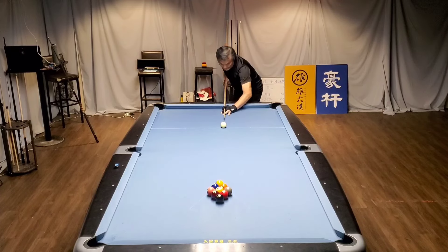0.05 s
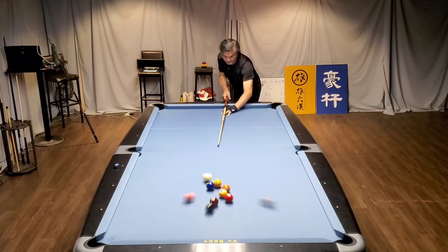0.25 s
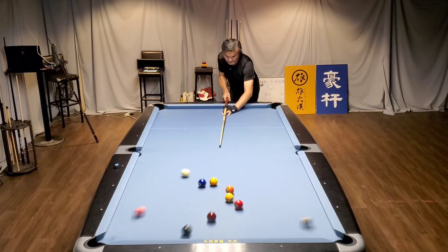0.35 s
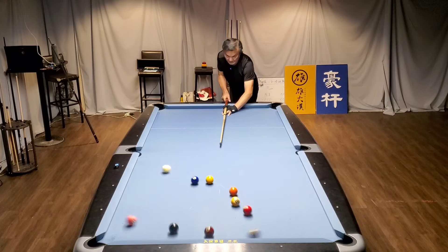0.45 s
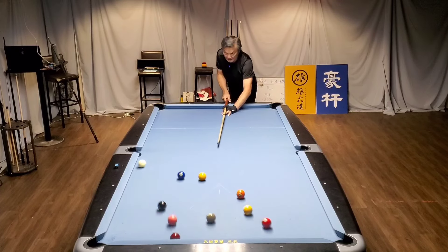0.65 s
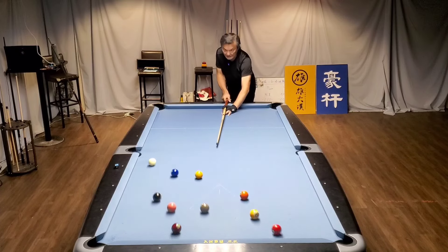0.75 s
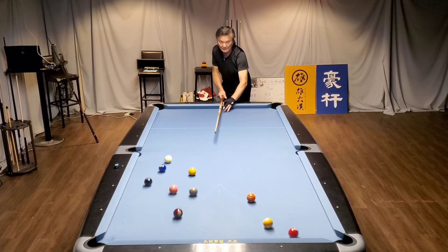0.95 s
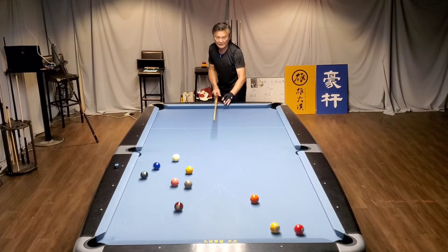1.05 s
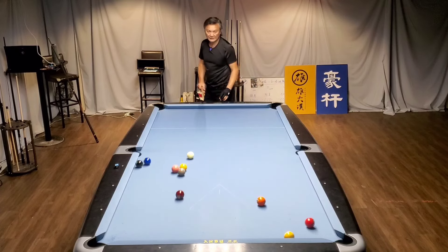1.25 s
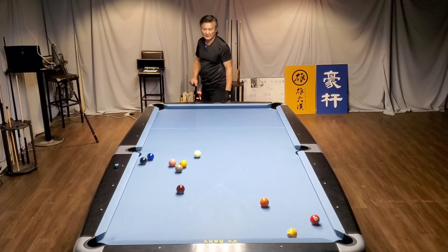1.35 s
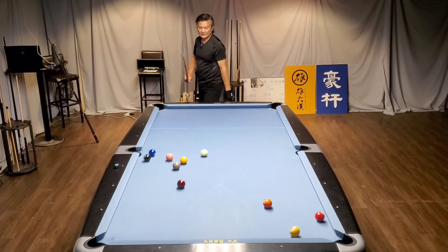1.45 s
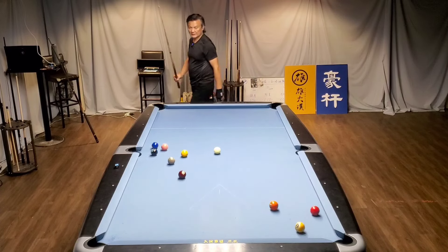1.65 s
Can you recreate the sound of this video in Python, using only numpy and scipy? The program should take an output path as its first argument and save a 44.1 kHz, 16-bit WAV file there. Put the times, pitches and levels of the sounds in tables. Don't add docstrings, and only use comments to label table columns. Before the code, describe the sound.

A pool break shot in a quiet, lively room. After faint room tone, a hard woody cue snap at 0.21 s, then at 0.34 s a piercing, clipped crack as balls burst apart, with low table boom and short reverberation. Cushion thuds tumble from 0.38 to 0.6 s. Crisp ball clicks at 0.67 and 0.74 s, a soft rail knock at 0.78, then softer clicks at 1.31, 1.37 and 1.42 s.

```python
import sys
import numpy as np
from scipy import signal
from scipy.fft import rfft, irfft, next_fast_len
from scipy.io import wavfile

SR = 44100
rng = np.random.default_rng(int(sys.argv[2]) if len(sys.argv) > 2 else 0)


def unload_audio(sound):
    columns = np.transpose(np.atleast_2d(sound))
    steps = np.round(np.clip(columns, -1, 1) * 32767)
    wavfile.write(sys.argv[1], SR, steps.astype(np.int16))


def natural_amplitude(level_db):
    exponent = np.asarray(level_db, float) / 20
    return 10 ** exponent


N = 74970
T = np.arange(N) / SR
SIZE = next_fast_len(2 * N)
HZ = np.arange(SIZE // 2 + 1) * SR / SIZE


def shape(x, response):
    return irfft(rfft(x, SIZE) * response, SIZE)[..., :N]


def band(hz, width_hz):
    return 1j * HZ * width_hz / (hz ** 2 - HZ ** 2 + 1j * HZ * width_hz)


def soft(hz):
    return 1 / (1 + 1j * HZ / hz)


def thin(hz):
    return 1j * HZ / (hz + 1j * HZ)


def peak(x, db):
    return x * natural_amplitude(db) / np.abs(x).max()


def fade(start, t60, rise):
    t = np.maximum(T - start, 0)
    return (1 - np.exp(-t / max(rise, 1e-4))) * natural_amplitude(-60 * t / t60)


def pan(db):
    return natural_amplitude(np.array([[db], [-db]]) / 2)


def widen(mid, side):
    bass_wide_db = -17
    return mid + natural_amplitude(bass_wide_db) * side * np.array([[1], [-1]])


def air():
    # f/Hz, density/dB
    air_spectrum = np.array([(18, -74), (30, -52), (79, -12), (210, -7), (295, -8.5), (449, -15.5),
                             (600, -14), (1860, -31.5), (16000, -37)])
    level_db, side_db, left_db = -68.5, -4.5, 6
    density_db = np.interp(np.log(HZ + 1), np.log(air_spectrum[:, 0]), air_spectrum[:, 1])
    noise = shape(rng.standard_normal((3, N)), natural_amplitude(density_db))
    noise = noise / noise.std() * natural_amplitude(level_db)
    tone = pan(left_db) * (noise[0] + natural_amplitude(side_db) * noise[1:])

    earlier_db, earlier_t60_s, earlier_pan_db = -69.5, 0.39, -9
    earlier = shape(rng.standard_normal(N), band(400, 1500) ** 2)
    earlier = earlier / earlier.std() * natural_amplitude(earlier_db - 60 * T / earlier_t60_s)
    return tone + pan(earlier_pan_db) * earlier


def booms():
    # t/s, level/dB, t60/s
    frame_swells = [
        (.001, -68, .4),
        (.215, -49, 0.86),
        (.34, -23, 0.11),
        (0.438, -38.5, 0.58),
        (.68, -51, 0.67),
        (.79, -61.5, 0.24),
        (.92, -59, 0.48),
        (1.266, -42.5, 0.11),
        (1.44, -65, .3),
    ]
    frame_hz, width_hz, rise_s = 82, 40, .015
    mid, side = shape(rng.standard_normal((2, N)), band(frame_hz, width_hz) ** 2)
    noise = widen(mid, side) / mid.std()
    return noise * sum(natural_amplitude(db) * fade(s, t60, rise_s) for s, db, t60 in frame_swells)


def thuds():
    # t/s, level/dB, f/Hz, t60/s
    cushion_hits = [(.017, -49, 700, .03), (0.3384, -24, 900, 0.0067), (.343, -13, 560, 0.022),
                    (0.383, -24, 420, .05), (.432, -12, 587, 0.018), (0.451, -21.5, 541, 0.086),
                    (0.502, -24, 370, .06), (.545, -27, 321, 0.02), (.59, -44.5, 425, 0.092),
                    (0.624, -35, 407, 0.025), (.68, -41.5, 373, 0.017), (0.779, -34.5, 445, 0.0497),
                    (0.817, -49.5, 330, .06), (1.262, -54, 214, 0.075), (.24, -34, 520, 0.28),
                    (0.288, -32, 480, 0.13)]
    push_rise_s, knock_db = .016 / 4, -11
    out = np.zeros((2, N))
    for s, db, hz, t60 in cushion_hits:
        push = rng.standard_normal((2, N)) * fade(s, t60, push_rise_s)
        rail = band(hz, hz * .6) ** 2
        knock = band(hz * .4, hz * .45) ** 2
        mid, side = peak(shape(push, rail + natural_amplitude(knock_db) * knock), db)
        out += widen(mid, side)
    return out


def clicks():
    meetings = [(.3408, 2), (.3415, 3), (.3449, 2), (.3465, 5), (.3655, 4), (.6650, 2), (.6654, 3),
                (.74172, 2), (.74203, 3), (1.3118, 2), (1.36545, 2), (1.42105, 2), (.0203, 2)]
    # contact time/ms, time between pulses/ms, level change per pulse/dB
    contacts = [(.3, .3, -.5), (.3, .31, .1), (.55, .5, -8), (.24, .225, -.5), (.34, .37, -.5), (.4, 1, 0),
                (.4, .7, -1), (.39, .73, -1), (.39, .72, -1.5), (.52, .9, -6), (.46, 1.17, -13),
                (.47, .9, -14), (.7, 1.3, -3)]
    # direct level/dB, level into the room/dB
    meeting_levels = [(4, 2.5), (0.5, -3), (1, -7), (-1, -1.5), (-11.5, -4), (-24.5, -19.5), (-66, -78),
                      (-10, -17.5), (-31, -46), (-67, -44), (-16.5, -28.5), (-17.5, -30.5), (-51.5, -62)]
    # f/Hz, width/Hz, level/dB
    resin_modes = [(6200, 680, -14), (9300, 1300, 1.5), (13000, 4000, 4.5)]
    resin_direct_db = -8.5
    ball = band(2450, 2000) * thin(800) ** 3
    resin = sum(natural_amplitude(db) * band(hz, width_hz) ** 2 for hz, width_hz, db in resin_modes)
    toward_us = ball * soft(4000) + natural_amplitude(resin_direct_db) * resin

    direct, wet = np.zeros(N), np.zeros(N)
    for (s, count), (contact_ms, step_ms, change_db), (db, room_db) in zip(meetings, contacts, meeting_levels):
        order = np.arange(count)
        late_ms = (T - s) * 1000 - step_ms * order[:, None]
        push = np.sin(np.pi * np.clip(late_ms / contact_ms + 1, 0, 1)) ** 2
        chain = -natural_amplitude(change_db * order) @ push
        direct += peak(shape(chain, toward_us), db)
        wet += peak(shape(push[0], ball + resin), room_db)

    rattle = rng.standard_normal(N) * fade(.341, t60=.02, rise=0)
    return direct, wet + peak(shape(rattle, band(6500, 9000)), -27)


def cue():
    # t/s, level/dB, length/s
    tip_blows = [
        (.2116, -22, .0015),
        (.2134, 0, .0008),
        (.2150, -3, .0012),
        (.2186, -11, .0015),
    ]
    # f/Hz, level/dB, t60/s
    shaft_modes = [(150, -19.5, .04), (420, -16.5, 0.014), (620, -8, 0.013), (1166.4, -10.5, 0.019),
                   (1717, -12.5, .04), (2173, -16, 0.013), (2222, -14, .03), (2724, -14, .03),
                   (3500, -10.5, 0.019), (4165, -2, 0.013), (4800, 6, 0.0078), (7900, -5, 0.0066),
                   (10000, -9, 0.0029), (12800, -16.5, .01)]
    snap_db, snap_t60_s = 8.5, 0.00029
    level_db, crack_db, room_crack_db = -4, -22.5, -14.5
    envelope = sum(natural_amplitude(db) * fade(s, 4 * length, length / 4) for s, db, length in tip_blows)
    rough = rng.standard_normal(N) * envelope
    snap = sum(natural_amplitude(db + snap_db) * fade(s, snap_t60_s, 0) for s, db, _ in tip_blows)
    blow = shape(rough + snap, soft(9230))

    def ringing(blur):
        body = 0
        for k, (hz, db, t60) in enumerate(shaft_modes):
            width_hz = blur * np.log(1000) / np.pi / t60
            body = body + (-1) ** k * natural_amplitude(db) * band(hz, width_hz) * t60
        return natural_amplitude(level_db) * (peak(shape(blow, body), 0) + peak(rough, crack_db))

    near, far = ringing(1), ringing(3.0)
    return near, shape(far, soft(5000)) + peak(rough, room_crack_db)


def room():
    # f/Hz, level/dB, t60/s
    room_bands = np.array([(100, -2, 0.24), (240.74, 7, .45), (700, 4, 0.42), (1670, -1, 0.38),
                           (3240, -10.5, 0.48), (6000, -4.5, 0.32), (9300, 3, 0.18), (14000, 3.5, 0.14)])
    gap_s, rise_s, sparse_s, roughness = .0008, 0.0079, 0.013, 0.98
    early, wide_db = 0.29, -23.5
    sparse = np.abs(rng.standard_normal((2, N))) ** (3 * roughness * np.exp(-T / sparse_s))
    out = 0
    for hz in 60 * 2 ** np.arange(0, 8.1, .5):
        db, t60 = (np.interp(np.log(hz), np.log(room_bands[:, 0]), room_bands[:, k]) for k in (1, 2))
        echoes = shape(sparse * rng.standard_normal((2, N)), band(hz, hz * .7) ** 2)
        decay = early * fade(gap_s, t60, 0) + fade(gap_s, t60, rise_s)
        out = out + natural_amplitude(db) * echoes * decay
    mid, side = out / np.sqrt(SR / 100)
    return rfft(mid + natural_amplitude(wide_db) * side * np.array([[1], [-1]]), SIZE)


def scene():
    cue_pan_db, cue_pan_hz = 8, 4516
    cue_room_db, thud_room_db = -3, -13
    background, swells, knocks = air(), booms(), thuds()
    direct, wet = clicks()
    stick, blurred = cue()
    lean = 2 + (pan(cue_pan_db) - 1) * np.abs(band(cue_pan_hz, cue_pan_hz))
    wet = wet + natural_amplitude(cue_room_db) * blurred + natural_amplitude(thud_room_db) * knocks.mean(axis=0)
    return direct + shape(stick, lean) + knocks + swells + shape(wet, room()) + background


def low_pass(x):
    return signal.sosfilt(signal.butter(12, 16390, fs=SR, output="sos"), x)


def record(dry):
    clip_level = .99
    mic = shape(dry, thin(66) ** 2)
    return low_pass(np.clip(mic, -clip_level, clip_level))


dry = scene()
out = record(dry)
unload_audio(out)
```